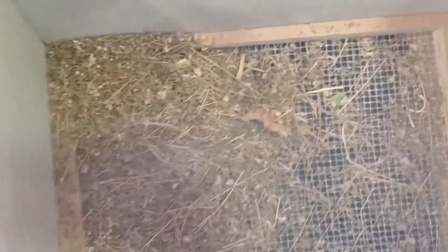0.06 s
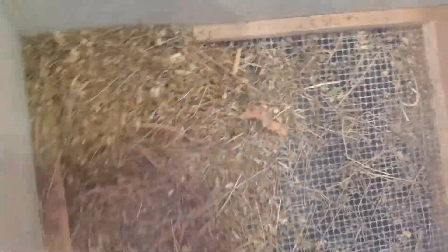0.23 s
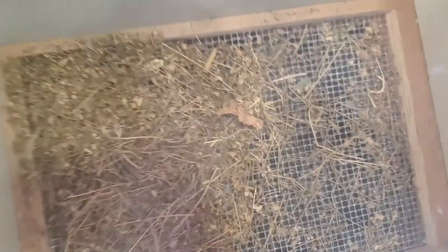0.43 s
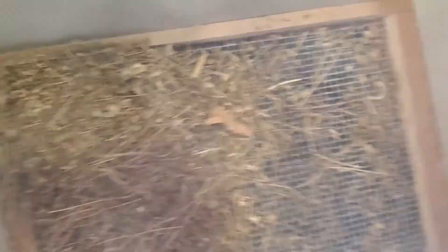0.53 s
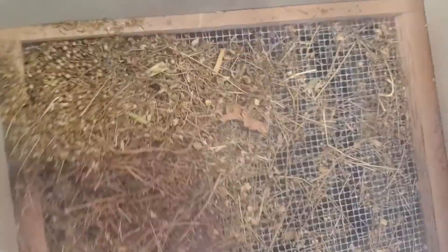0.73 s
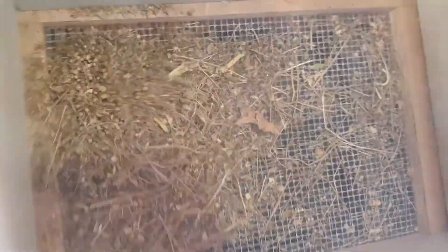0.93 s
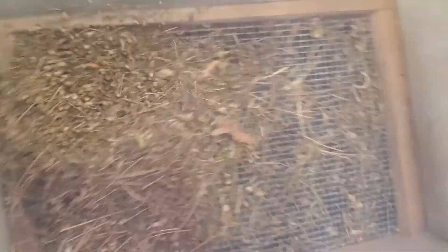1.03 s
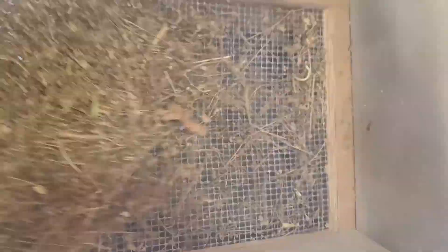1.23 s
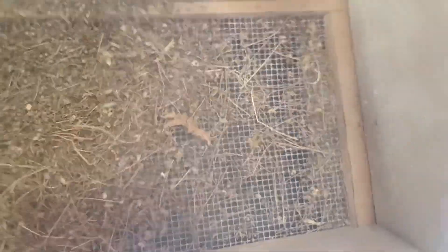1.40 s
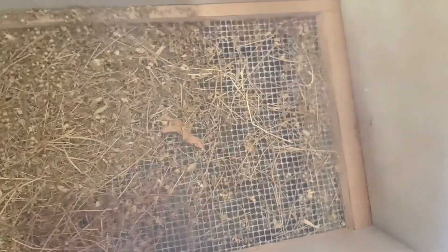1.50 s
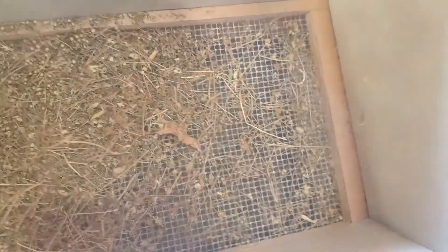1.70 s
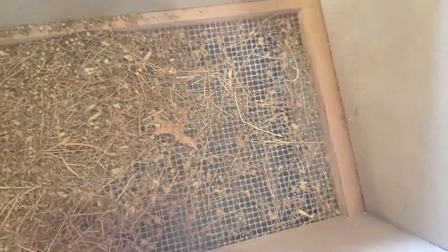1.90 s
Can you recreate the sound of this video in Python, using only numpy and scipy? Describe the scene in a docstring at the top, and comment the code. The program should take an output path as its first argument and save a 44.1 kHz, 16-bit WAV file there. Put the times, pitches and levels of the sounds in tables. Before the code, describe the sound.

A wooden-framed sieve is shaken against a tub, with irregular knocks, low booms and gritty rushes of seed; it stops, leaving small ticks of settling stems over quiet open air, heard close on a phone.

```python
"""Wooden knocks and low booms, rushes of seed and a gritty scrape, then a few ticks, over a quiet farm.
A wooden-framed wire screen full of seed and stems is shaken by hand inside a tub, close to a phone.
Blows and chatter ring modes of tub wall, frame and slats; the scrape and dry cracks are banded noise.
Seed is random clicks on the mesh, stems are short noisy rings, the farm is coloured noise."""
import sys
import numpy as np
from scipy import signal
from scipy.fft import rfft, irfft
from scipy.io import wavfile
from scipy.ndimage import uniform_filter1d

SR = 44100
rng = np.random.default_rng(int(sys.argv[2]) if len(sys.argv) > 2 else 0)


def linear_from_db(decibels):
    """Turn decibels (scalar or array-like) into linear amplitude factors; 0 gives 1."""
    return 10 ** (np.asarray(decibels, float) / 20)


def digitize_waveform(pressure):
    """Quantize a signal to 16-bit integers and store it at the path in sys.argv[1].

    Rows of a 2-D input are taken as channels; values are limited to [-1, 1].
    """
    field = np.atleast_2d(pressure).T
    bounded = np.clip(field, -1, 1)
    quanta = np.round(bounded * 32767).astype(np.int16)
    wavfile.write(sys.argv[1], SR, quanta)


N = 85995


def unit(x):
    """Scale to rms 1."""
    return x / np.sqrt(np.mean(x ** 2))


def colour(x, points, share=1):
    """Filter along the last axis by (frequency [Hz], gain [dB]) points; share scales the dB."""
    p = np.array(points)
    hz = np.maximum(np.arange(N // 2 + 1) * SR / N, 1)
    gain_db = np.interp(np.log(hz), np.log(p[:, 0]), p[:, 1])
    return irfft(rfft(x) * linear_from_db(share * gain_db), N)


def curve(table, column):
    """Gain over time from a dB column."""
    p = np.array(table)
    return linear_from_db(np.interp(np.arange(N) / SR, p[:, 0], p[:, column]))


def ring(x, hz, t60_s):
    """One decaying mode, its pitch given for each sample; a unit impulse rings with peak 1."""
    turn = np.exp(2j * np.pi * np.cumsum(hz) / SR)
    pole = linear_from_db(-60 / (max(t60_s, .003) * SR))
    return (turn * signal.lfilter([1], [1, -pole], x / turn)).imag


def contact(start_s, t60_s):
    """Envelope of a contact: the longer it lasts, the softer it sets in."""
    age_s = np.maximum(np.arange(N) / SR - start_s, 0)
    rise_share = .03  # of t60
    return np.minimum(age_s / (rise_share * t60_s), 1) * linear_from_db(-60 * age_s / max(t60_s, .01))


def band(x, hz, width_hz):
    """Broad band-pass."""
    return signal.lfilter(*signal.iirpeak(min(hz, SR / 3), hz / width_hz, fs=SR), x)


def grit(per_s, spread_db, channels=1):
    """Random impacts of either sign, a few much stronger than the rest."""
    chance, sign, strength = rng.random((3, channels, N))
    size = linear_from_db(-spread_db * np.log(1 - .995 * strength))
    return (chance < per_s / SR) * np.sign(sign - .5) * size


def walk(rate_hz):
    """Smooth random wander, rms 1."""
    k = int(SR / rate_hz)
    return unit(uniform_filter1d(uniform_filter1d(rng.standard_normal(N), k), k))


def struck(modes, column, push_s, drag, chatter_db, ports_db, bend, flip=1):
    """Each knock pushes the modes at a new spot, then chatters in small bounces; drag stirs them too.

    The modes drift (bend: rms share of pitch) as grip and load shift; each port hears its own mode mix.
    """
    # frame against tub: (time [s], frame level [dB], boom level [dB], wood level [dB], chatter t60 [s])
    knocks = np.array([(.037, -32, -25.5, -38, 0.061), (0.071, -47, -26.5, -72, 0.092),
                       (0.165, -18.5, -13, -37.5, 0.27), (.194, -23.5, -11, -37.5, 0.06),
                       (0.306, -31, -10, -33.5, 0.91), (0.365, -9, -10.5, -16.5, 0.013),
                       (.448, -24, -13, -37.5, 0.12), (0.477, -30, -12, -52, 0.03),
                       (.52, -19, -31, -32, 0.25), (0.558, -3, -3, -16.5, 0.044),
                       (0.585, -49, 0, -71, 0.085), (.676, -19, -8, -35, 0.11),
                       (.712, -30, -42, -34.5, 0.25), (0.747, -14.5, -10, -25.5, 0.24),
                       (.793, -5, 2, -17.5, 0.11), (0.823, -5, -17, -20, 0.022),
                       (0.859, -19.5, -9.5, -45, 0.13), (.924, -17.5, -11, -28, 0.11),
                       (1.0135, -4, -4, -12.5, 0.068), (1.043, -5.5, -18, -15, 0.15),
                       (1.055, -9.5, -3, -15.5, 0.025), (1.069, -10, -6, -23, 0.041),
                       (1.11, -21, -18, -31.5, 0.1), (1.149, -17.5, -15.5, -30.5, 0.11),
                       (1.209, -37, -28, -43, 0.15), (1.293, -23, -50, -41, 0.17),
                       (1.329, -10.5, -10.5, -18, 0.12), (1.343, -20, -4.5, -34.5, 0.29),
                       (1.422, -15.5, -8, -28, 0.1), (1.456, -26, -25, -66, 0.086)])
    slide_db_per_s = 20  # long contacts slide and strike less
    t = np.arange(N) / SR
    at = (knocks[:, 0] * SR).astype(int)
    spot = rng.standard_normal((len(knocks), len(modes), 3))
    bounce = sum(linear_from_db(k[column]) * contact(k[0], k[4]) for k in knocks)
    loose = drag + linear_from_db(chatter_db) * bounce * grit(per_s=1500, spread_db=2.2)[0]
    blow_db = knocks[:, column] - slide_db_per_s * knocks[:, 4]
    push_t = t[:SR // 20]
    push = push_t ** 2 * np.exp(-2 * push_t / push_s)
    out = 0
    for k, (hz, mode_db, t60_s) in enumerate(modes):
        x = loose * linear_from_db(ports_db * spot[0, k, 1:, None])
        x[:, at] += linear_from_db(blow_db + 2.0 * spot[:, k, 0] + ports_db * spot[:, k, 1:].T)
        drifting_hz = hz * (1 + bend * walk(12))
        out = out - flip ** k * linear_from_db(mode_db) * ring(x, drifting_hz, t60_s)
    return signal.fftconvolve(out, push[None] / push.sum(), axes=1)[:, :N]


def frame():
    """Knocks and drag ring tub, frame and slats; dry cracks and the scrape are broad noise."""
    # modes of the tub wall: (frequency [Hz], level [dB], t60 [s])
    boom_modes = [(60.1, -1.5, 0.31), (70.2, 1, 0.14), (81.36, 1.5, 0.3), (100, -36.5, 0.31)]
    # modes of the frame bending: (frequency [Hz], level [dB], t60 [s])
    frame_modes = [(133, -10, 0.21), (182.7, -7.5, 0.13), (220.7, -2, 0.061), (257, -3, 0.048),
                   (310.7, -3, 0.056)]
    # modes of the slats: (frequency [Hz], level [dB], t60 [s])
    wood_modes = [(417.5, 1, 0.035), (584.4, -4.5, 0.047), (666.6, 5.5, 0.033), (869, 8.5, 0.016),
                  (1045, 4, 0.034), (1170, 9, 0.02), (1454, 11.5, 0.024), (1636, 8, 0.038),
                  (1990, 14.5, 0.011), (2457, 8, 0.055)]
    # frame dragging on the tub: (time [s], relative rumble level [dB], relative scrape level [dB])
    drag = [(0.0, -40, -103), (0.206, -42, -65.5), (0.434, -16.5, -49), (0.536, -12.5, -97),
            (0.662, -22, -57), (0.994, -32, -62), (1.118, -6, -52.5), (1.298, -32, -69.5),
            (1.472, -48, -104), (1.95, -39, -66)]
    # wood meeting the wall squarely: (time [s], relative level [dB], t60 [s])
    cracks = [(0.037, -37, 0.03), (0.186, -39.5, 0.14), (0.368, -20, 0.016), (0.5596, -20.5, 0.041),
              (0.7504, -35, 0.31), (0.7918, -27, 0.13), (0.8194, -31, 0.035), (0.92, -41, 0.15),
              (1.0135, -12, 0.019), (1.047, -21.5, 0.036), (1.0551, -24.5, 0.22), (1.329, -5.5, 0.025),
              (1.418, -26, 0.097)]

    rub = unit(grit(per_s=900, spread_db=2.2)[0])
    stir = linear_from_db(-36) * rub * curve(drag, 1)
    scrape = curve(drag, 2)
    out = linear_from_db(-0.5) * struck(boom_modes, column=2, push_s=.0045, drag=stir,
                             chatter_db=-34, ports_db=1.5, bend=.02)
    out += linear_from_db(0.5) * struck(frame_modes, column=1, push_s=.00084, drag=linear_from_db(-3.0) * stir,
                             chatter_db=-17, ports_db=0.5, bend=.06)
    out += linear_from_db(-2.5) * struck(wood_modes, column=3, push_s=.00025, drag=linear_from_db(-10) * rub * scrape,
                              chatter_db=-10.5, ports_db=4, bend=.06, flip=-0.97)
    env = linear_from_db(11.5) * scrape
    for start_s, db, t60_s in cracks:
        env = env + linear_from_db(db) * contact(start_s, t60_s)
    noise = rng.standard_normal((2, N)) + 0.29 * rng.standard_normal(N)  # partly shared by the ports
    centre_hz, width_hz = 3600, 5500
    dry_noise = unit(band(band(noise, centre_hz, width_hz), centre_hz, width_hz))
    return out + linear_from_db(-3.0) * env * dry_noise


def seed():
    """Thousands of tiny clicks on the wires; each port hears mostly its own grains."""
    # seed thrown over the mesh: (peak time [s], level [dB], rise [s], fall [s])
    rushes = [(.2, -53.5, 0.042, 0.057), (0.387, -29.5, 0.019, 0.018), (.565, -31.5, 0.0097, 0.024),
              (0.616, -22, 0.0096, 0.013), (0.809, -30.5, 0.0049, 0.011), (0.872, -22.5, 0.018, 0.016),
              (0.938, -39, 0.076, 0.0067), (1.059, -33.5, 0.043, 0.1), (1.114, -21.5, 0.022, 0.0095),
              (1.341, -39.5, 0.029, 0.029), (1.378, -23.5, 0.025, 0.017), (1.429, -41, 0.032, 0.039)]
    # seed trickling through between throws: (time [s], relative level [dB])
    trickle = [(0.0, -41), (0.308, -58), (0.51, -37.5), (0.874, -44), (0.972, -42.5), (1.086, -43.5),
               (1.27, -36), (1.814, -49.5), (1.95, -59)]
    # spectral shape of the clicks: (frequency [Hz], relative level [dB per Hz])
    spectrum = [(500, -16), (1000, -7), (1600, -7), (2300, -7.5), (3500, -4), (5000, -8), (6800, -7),
                (9000, -9.5), (12000, -11), (15800, -18.5), (16500, -56)]
    t = np.arange(N) / SR
    env = linear_from_db(-4) * curve(trickle, 1)
    for peak_s, db, rise_s, fall_s in rushes:
        spread_s = np.where(t < peak_s, rise_s, fall_s)
        env = np.hypot(env, linear_from_db(db) * np.exp(-((t - peak_s) / spread_s) ** 2 / 2))
    grains = grit(per_s=9000, spread_db=2.5, channels=3)
    flicker_db = 1.0 * walk(45)
    return unit(colour(grains[0] + 3.7 * grains[1:], spectrum)) * env * linear_from_db(flicker_db)


def stems():
    """Stems snap and settle: each tick is a short noisy ring with a shorter broad snap."""
    # (time [s], level [dB], ring frequency [Hz], t60 [s], snap level re tick [dB])
    ticks = [(1.562, -32, 10900, 0.029, -17), (1.614, -39.5, 2240, 0.053, 12),
             (1.65, -22, 2180, 0.052, -9.5), (1.665, -37.5, 12800, 0.024, 9), (1.736, -18, 415, 0.14, -14),
             (1.74, -29.5, 1570, 0.18, -13.5), (1.7663, -8.5, 1480, 0.021, -3),
             (1.774, -29.5, 1450, 0.094, -5), (1.897, -45, 14600, 0.016, -13), (1.925, -33, 2950, 0.06, 5)]
    rise_s = .0012
    t, out = np.arange(N) / SR, np.zeros(N)
    for start_s, db, hz, t60_s, snap_db in ticks:
        age_s = np.maximum(t - start_s, 0)
        decay = linear_from_db(-60 * age_s / max(t60_s, .005))
        burst = rng.standard_normal(N) * np.minimum(age_s / rise_s, 1) * decay
        tone = 2.25 * band(burst, hz, hz / 7)
        snap = band(band(burst * decay, 2300, 6300), 2200, 5400)
        out += linear_from_db(db) * (tone + linear_from_db(snap_db) * snap)
    return out


def farm():
    """Quiet open-air noise, wandering in level, its bass shared by both ports."""
    # spectral shape: (frequency [Hz], relative level [dB per Hz])
    spectrum = [(40, -7), (70, 7), (93, 0.5), (229, -8.5), (409, -20), (562, -24.5), (1150, -36),
                (1450, -25), (1660, -62), (8000, -78), (13000, -34), (16500, -34)]
    noise = rng.standard_normal((3, N))
    own = signal.lfilter(*signal.butter(1, 600, "high", fs=SR), noise[1:])
    return linear_from_db(-43.5) * unit(colour(noise[0] + own, spectrum)) * linear_from_db(1.2 * walk(12))


def tub_echo(near):
    """Short diffuse echo inside the tub: decaying noise, separate for each port."""
    t60_s, level_db, low_cut_hz = .025, -8, 270
    t = np.arange(SR // 8) / SR
    echo = rng.standard_normal((2, len(t))) * linear_from_db(-60 * t / t60_s) * (t > .001)
    echo = echo / np.sqrt((echo ** 2).sum(1, keepdims=True))
    echo = signal.lfilter(*signal.butter(1, low_cut_hz, "high", fs=SR), echo)
    return linear_from_db(level_db) * signal.fftconvolve(near, echo, axes=1)[:, :N]


def scene():
    """Sources and tub echo at two ports: the left is louder and earlier."""
    # level difference of the ports: (frequency [Hz], left minus right [dB])
    ports = [(60, 1.5), (200, 3.5), (700, 5.5), (2400, 8), (5000, 1.5), (9000, 1), (11500, 5),
             (14000, 19.5)]
    right_lag_s = .00023
    near = frame() + stems()
    out = near + tub_echo(near) + seed() + farm()
    lag = np.exp(-2j * np.pi * np.arange(N // 2 + 1) * SR / N * right_lag_s)
    right = irfft(rfft(out[1]) * lag, N)
    return np.array([colour(out[0], ports, 1 / 2), colour(right, ports, -1 / 2)])


def top_cut(x):
    """Nothing passes above the cut-off."""
    return signal.sosfilt(signal.butter(12, 16820, fs=SR, output="sos"), x)


def record(dry):
    """The phone cuts the deepest bass and the top, dips near 8 kHz and rounds the peaks."""
    low_cut_hz, top_hz, ceiling = 51, 15950, 1.05
    x = signal.sosfilt(signal.butter(4, low_cut_hz, "high", fs=SR, output="sos"), dry)
    x = x - 0.7 * band(x, hz=7930, width_hz=900)
    x = ceiling * np.tanh(x / ceiling)
    x = signal.sosfilt(signal.ellip(8, .2, 70, top_hz, fs=SR, output="sos"), x)
    return top_cut(x)


dry = scene()
out = record(dry)
digitize_waveform(out)
```